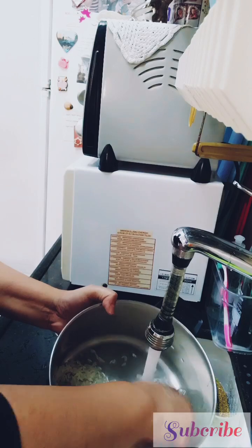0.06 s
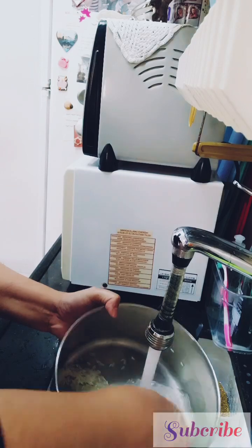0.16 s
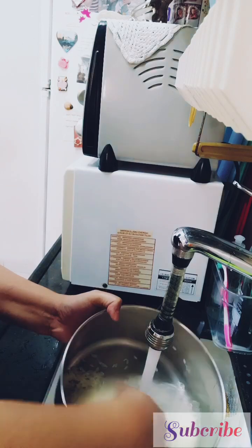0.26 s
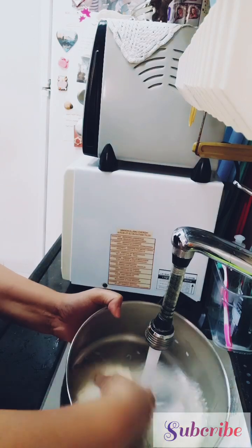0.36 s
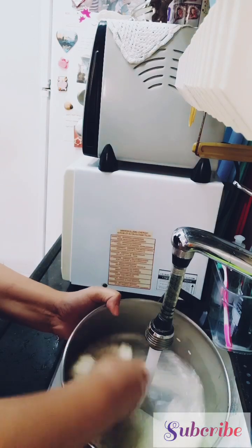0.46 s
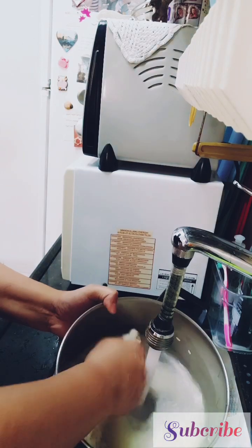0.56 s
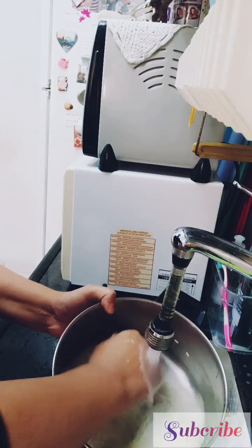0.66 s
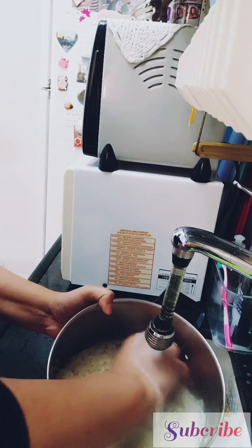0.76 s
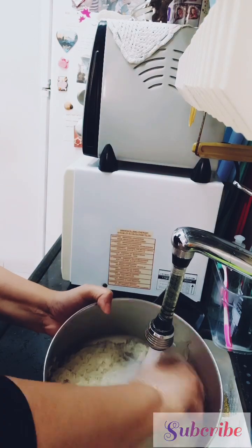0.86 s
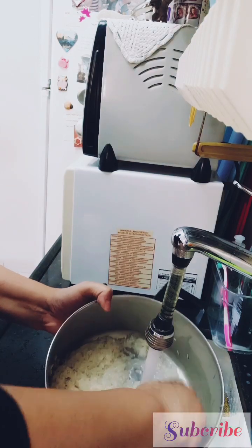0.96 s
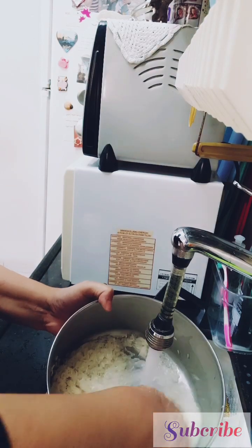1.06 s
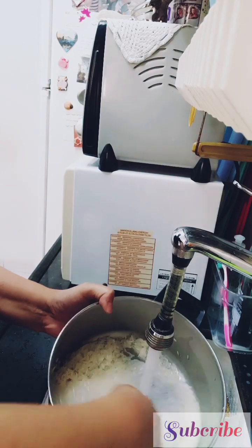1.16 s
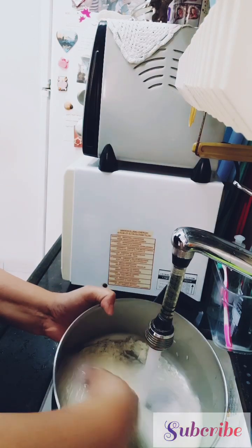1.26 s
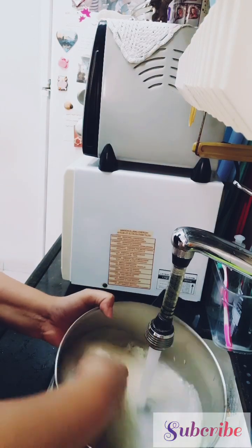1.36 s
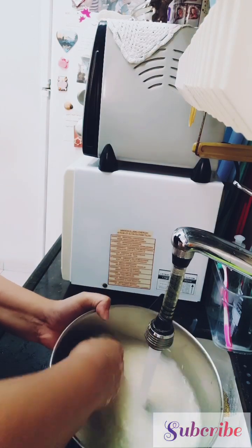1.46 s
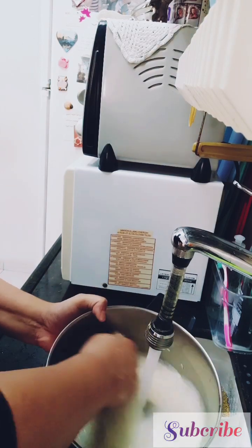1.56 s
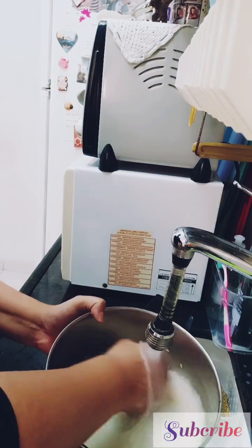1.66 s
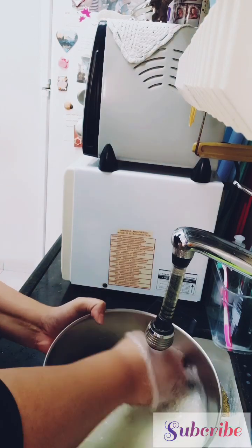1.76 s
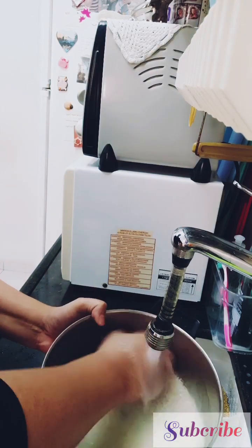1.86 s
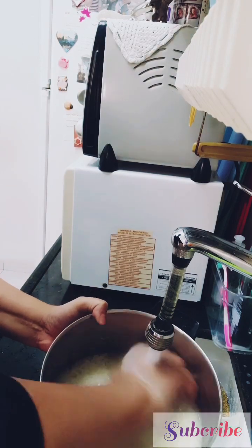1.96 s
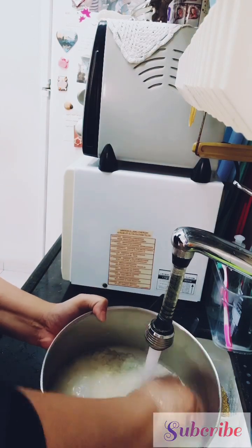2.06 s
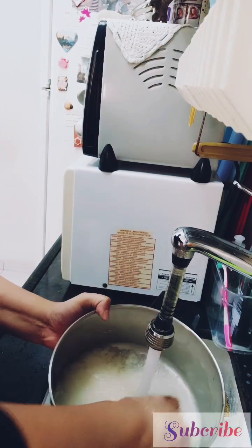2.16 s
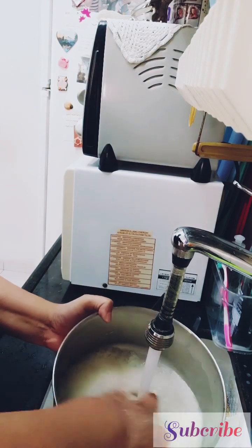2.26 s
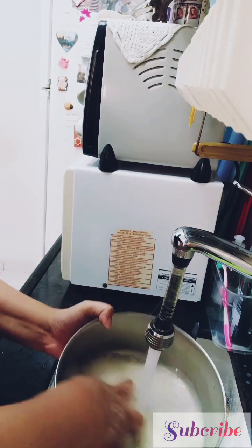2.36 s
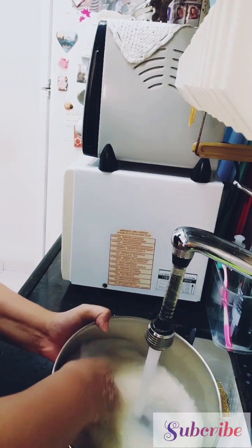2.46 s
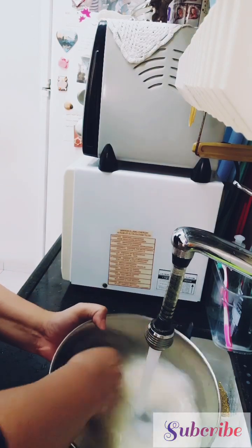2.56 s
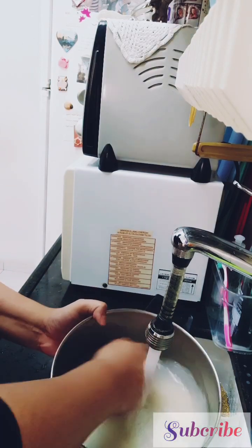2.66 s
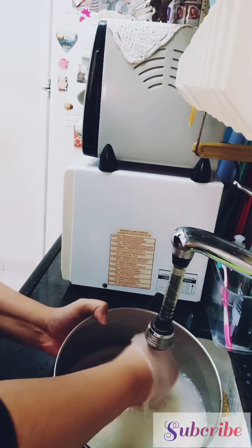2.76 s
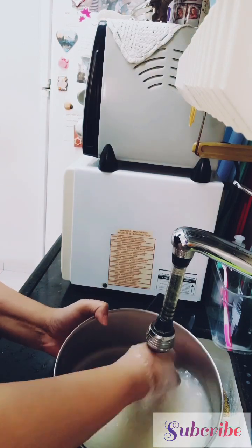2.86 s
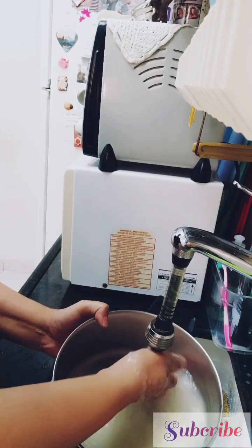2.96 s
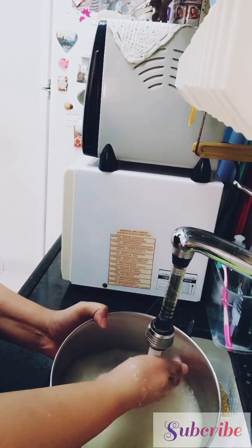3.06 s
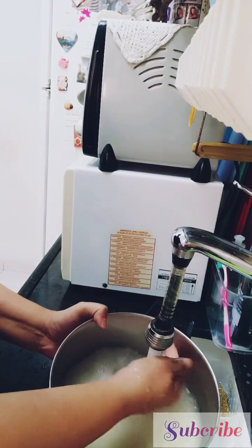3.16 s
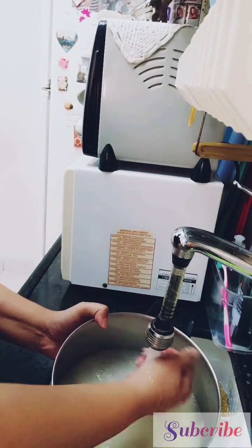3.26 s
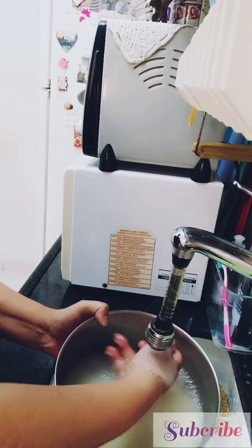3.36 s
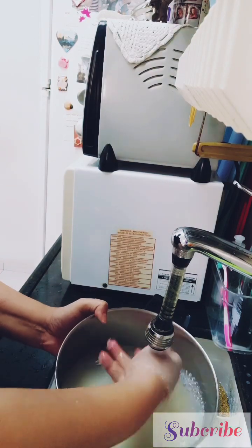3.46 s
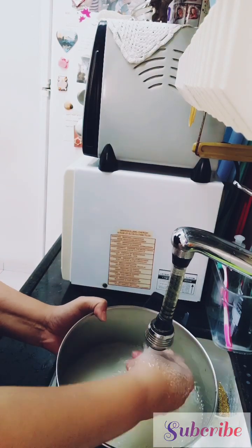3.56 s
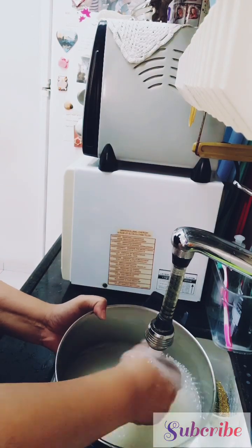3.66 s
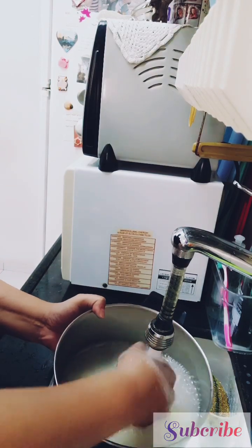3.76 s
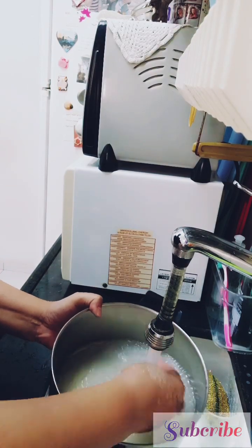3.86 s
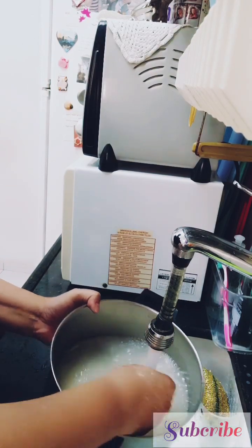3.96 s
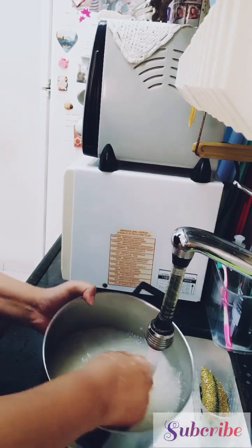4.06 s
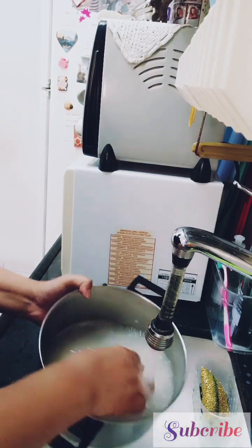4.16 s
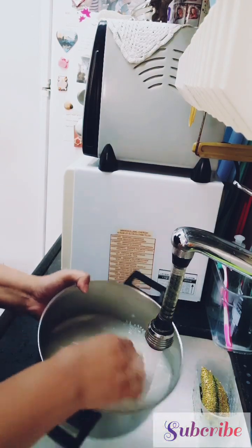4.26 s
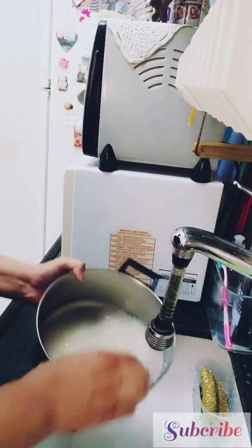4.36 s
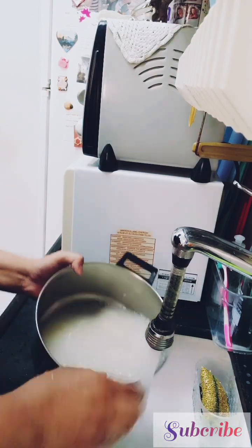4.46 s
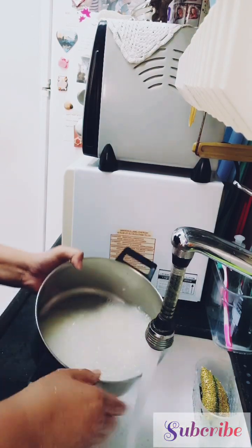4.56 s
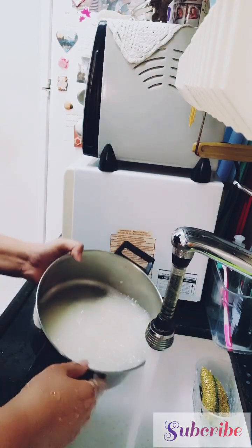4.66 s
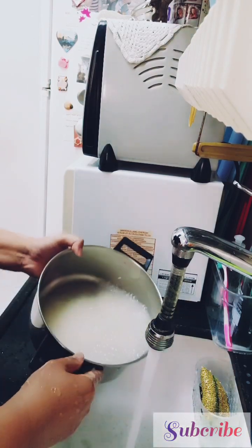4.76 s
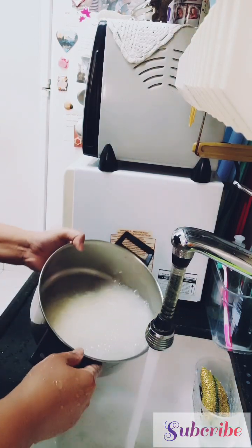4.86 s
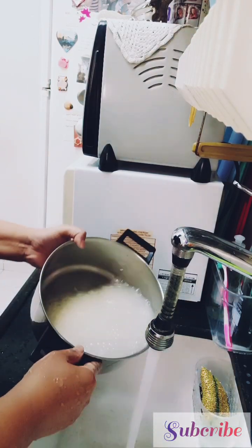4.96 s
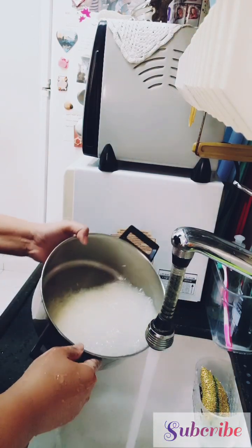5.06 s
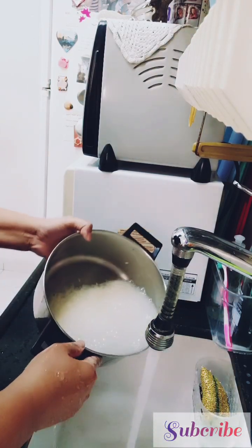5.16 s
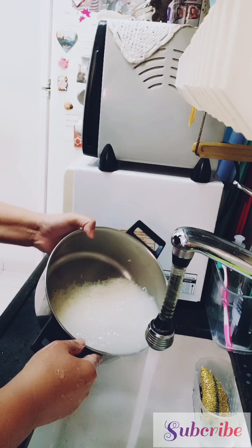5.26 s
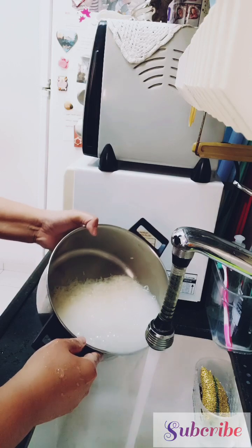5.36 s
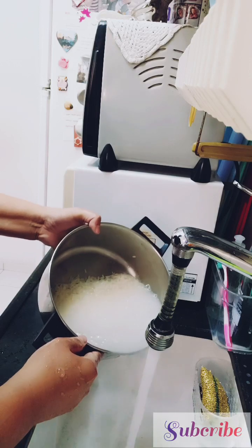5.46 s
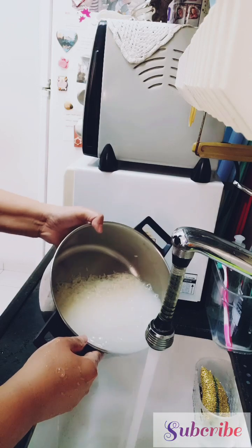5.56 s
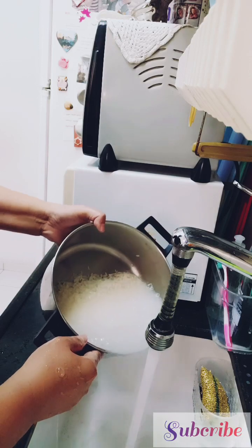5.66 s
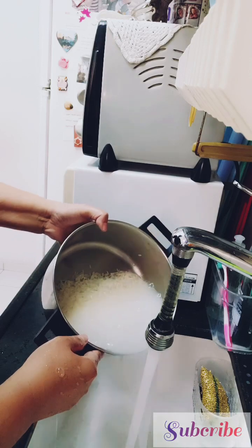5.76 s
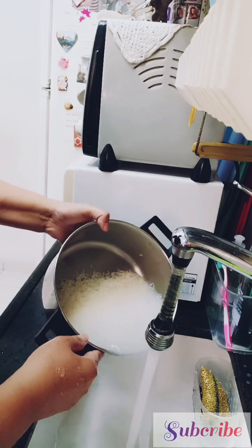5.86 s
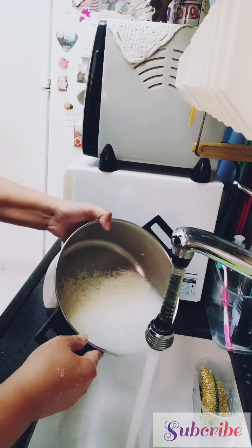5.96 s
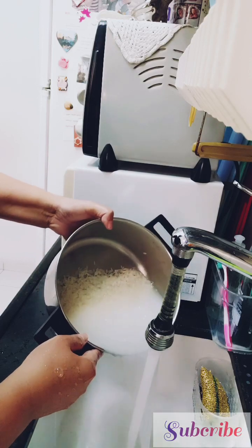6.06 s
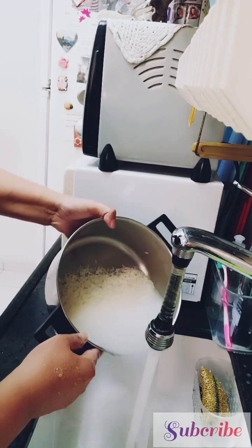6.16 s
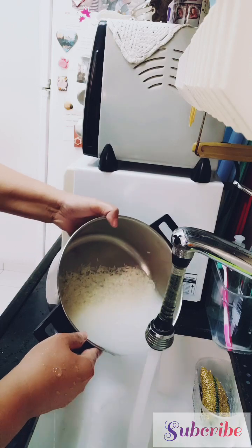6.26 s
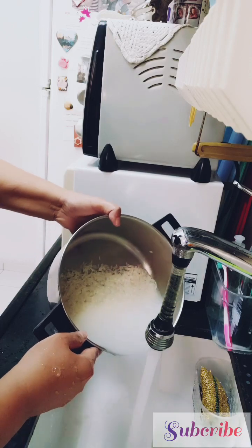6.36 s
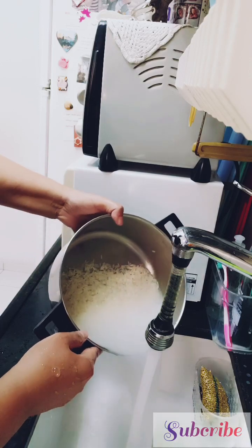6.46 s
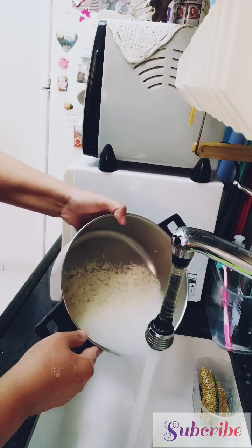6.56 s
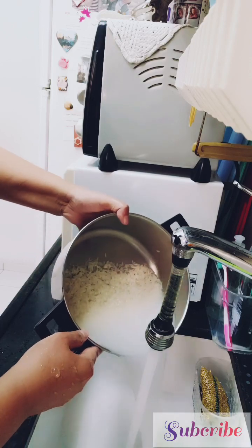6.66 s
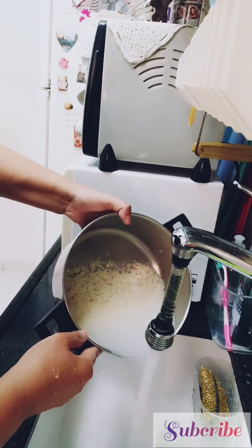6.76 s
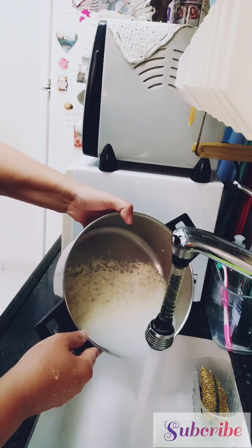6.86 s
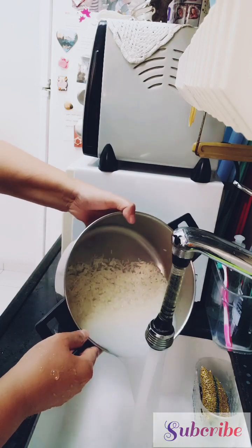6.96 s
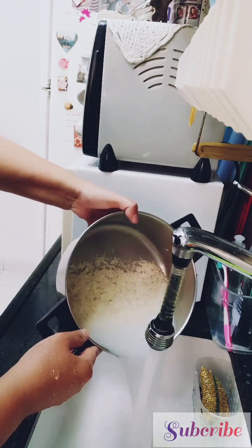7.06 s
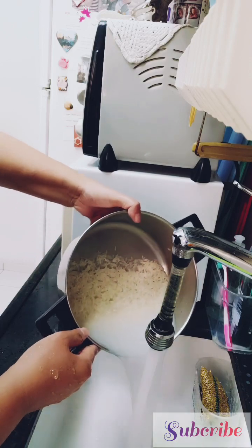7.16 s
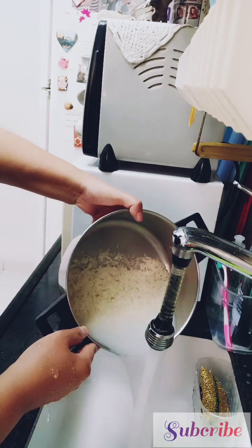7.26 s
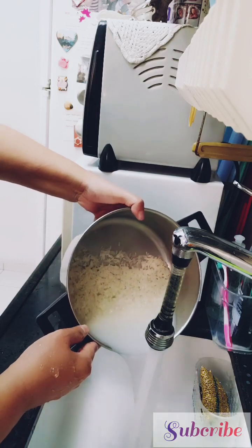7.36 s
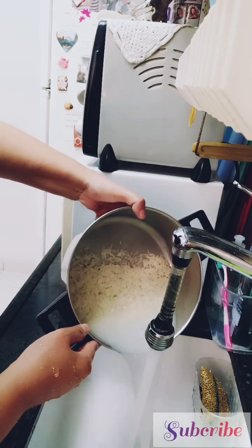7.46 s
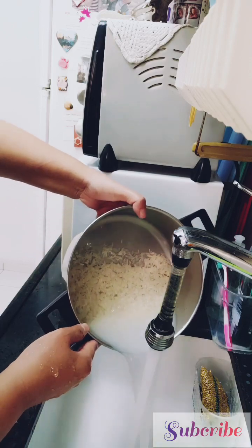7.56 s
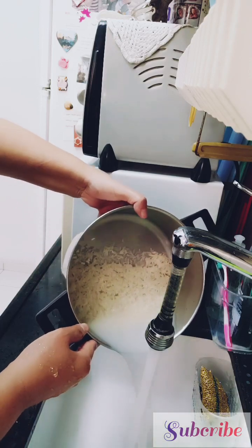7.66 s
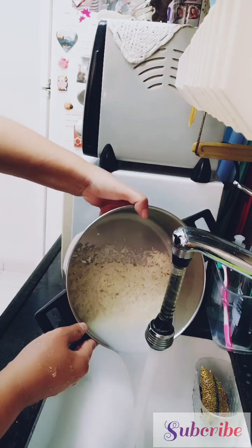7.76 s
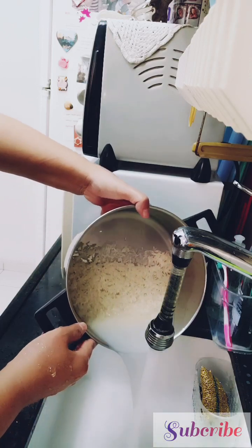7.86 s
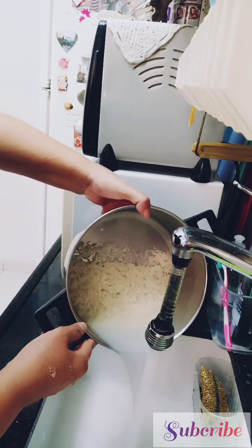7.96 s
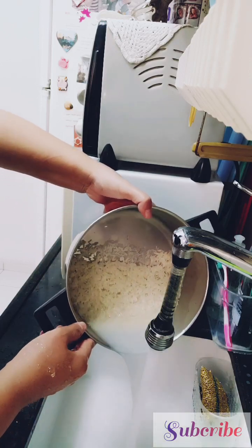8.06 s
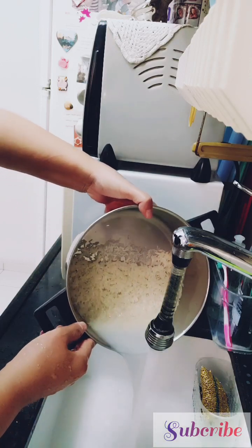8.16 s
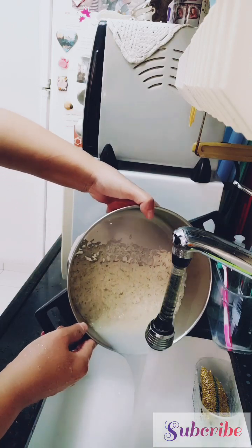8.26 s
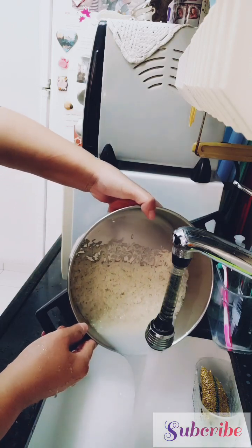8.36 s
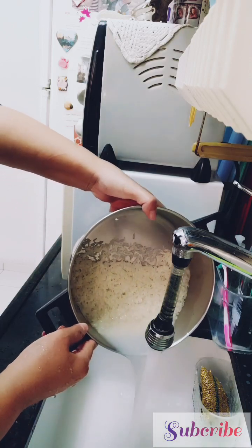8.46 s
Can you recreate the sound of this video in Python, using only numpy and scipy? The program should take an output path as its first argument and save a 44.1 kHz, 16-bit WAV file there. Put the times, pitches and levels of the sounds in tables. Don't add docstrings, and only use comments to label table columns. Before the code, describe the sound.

Close stereo microphones catch running water in two stages. First a modest, aerated plunge into a pot, stirred in rhythmic swishes, with plinks and rice pinging on steel, gradually softer. Halfway through it jumps to sharp hissing spatter on a ringing sink, broken by slops of poured water and cracking drops. A hard-surfaced room adds short reflections; faint machine hum and drain gurgles sit below.

```python
import sys
import numpy as np
from scipy import signal
from scipy.fft import rfft, irfft, next_fast_len
from scipy.io import wavfile
from scipy.ndimage import uniform_filter1d, minimum_filter1d

SR = 44100
rng = np.random.default_rng(int(sys.argv[2]) if len(sys.argv) > 2 else 0)


def file_out(sig):
    cols = np.atleast_2d(sig).T
    lim = np.clip(cols, -1, 1)
    pcm = np.round(lim * 32767).astype(np.int16)
    wavfile.write(sys.argv[1], SR, pcm)


def decibels_to_gain(level_db):
    exponent = np.asarray(level_db, float) / 20
    return 10 ** exponent


N = 374850

# [f/Hz, level/dB]
MIST = [(2000, -34.5), (5000, -21), (7500, 5.5), (9000, 2.5), (12000, 4.5), (14000, -3.5), (16000, 5.5)]
# [f/Hz, level/dB]
SINK_SPRAY = [(1000, -34.5), (2500, -31.5), (4500, -6.5), (6500, 6.5), (8500, 8), (11000, -36),
              (16000, -3.5)]
SINK_SLOSH = [(700, -47), (1500, -16), (2500, -5.5), (4000, -1.5), (5500, 5), (8000, -11)]
# [f/Hz, width/Hz, level/dB, left-right/dB]
SINK_RING = [(2470, 76, -6, -8), (3086, 94, -2.5, 1), (3450, 33, -5, -36), (3940, 75, 8, -1),
             (4150, 75, 0.5, 2), (4500, 79, -4, 7), (4710, 74, 9, -1), (6077, 123, 9, 10),
             (6490, 110, 0.5, 13.5), (8260, 46, 4.5, 18), (8810, 130, 4.5, -2), (9780, 97, -3, 13.5),
             (11740, 130, -2.5, 16), (16700, 350, 11.5, 20)]


def rms_one(x):
    return x / np.sqrt(np.mean(x ** 2) + 1e-20)


def in_time(rows):
    s, *columns = np.transpose(rows)
    return [np.interp(np.arange(N) / SR, s, c, left=-120) for c in columns]


def at_hz(points, hz):
    table_hz, values = np.array(points)[:, 0], np.array(points)[:, 1]
    return np.interp(np.log(hz + 1), np.log(table_hz), values)


def coloured(x, spectrum):
    magnitude = decibels_to_gain(at_hz(spectrum, np.fft.rfftfreq(8192, 1 / SR)))
    cepstrum = irfft(np.log(magnitude))
    cepstrum[1:4096] *= 2
    cepstrum[4097:] = 0
    response = irfft(np.exp(rfft(cepstrum)))[None, :4096]
    return signal.oaconvolve(x, response, axes=1)[:, :N]


def stereo_noise(lag):
    # [f/Hz, share 0-1]
    alike_share = [(25, 0.69), (130, 1), (300, 0.92), (600, 0.97), (1200, 0.18), (3000, 0.44), (6000, 0.67),
                   (12000, 0.17), (16000, 0.063)]
    size = next_fast_len(N)
    hz = np.fft.rfftfreq(size, 1 / SR)
    common, left, right = rfft(rng.standard_normal((3, size)))
    alike = np.clip(at_hz(alike_share, hz), 0, 1)
    late = common * np.exp(-2j * np.pi * hz * lag / SR)
    shared = np.sqrt(alike) * np.array([late, common])
    own = np.sqrt(1 - alike) * np.array([left, right])
    return irfft(shared + own, size)[:, :N]


def spatter(per_s, spread_db, burst_ms, share):
    sizes = decibels_to_gain(spread_db * np.minimum(rng.exponential(1, N), 3.2)) ** 2
    drops = sizes * (rng.random(N) < per_s / SR)
    r = np.exp(-1000 / (burst_ms * SR))
    power = signal.lfilter([1], [1, -r], drops)
    share = np.clip(share, 0, 1)
    return np.sqrt(1 - share + share * power / power.mean())


def patchy(x, together_db, own_db, per_s):
    hz, s, z = signal.stft(x, SR, nperseg=256)
    chance = rng.standard_normal((17, len(s)))
    r = np.exp(-2 * np.pi * per_s * 128 / SR)
    slow = rms_one(signal.lfilter([1], [1, -r], chance))
    place = np.clip(4 * np.log2(hz / 1000 + 1), 0, 14.99)
    low, part = place.astype(int), (place % 1)[:, None]
    own = (slow[low] * (1 - part) + slow[low + 1] * part) / np.hypot(part, 1 - part)
    gain = decibels_to_gain(together_db * slow[16] + own_db * own)
    return signal.istft(z * gain, SR, nperseg=256)[1][:, :N]


def ringing(x, modes, sign, wander_db=0, per_s=6.0):
    out, knots = 0, np.arange(0, N / SR + 1, 1 / per_s)
    for k, (hz, width, db, pan_db) in enumerate(modes):
        r = np.exp(-np.pi * width / SR)
        ring = signal.lfilter([1 - r, 0, r - 1], [1, -2 * r * np.cos(2 * np.pi * hz / SR), r * r], x)
        free = decibels_to_gain(wander_db * rng.standard_normal(400)[:len(knots)])
        moving = ring * np.interp(np.arange(N) / SR, knots, free)
        out = out + moving * decibels_to_gain(db + pan_db * np.array([[.5], [-.5]])) * sign ** k
    return out


def laid_out(at_s, hz, db, cycles, rise):
    t = np.arange(1500) / SR
    life = t * hz / cycles
    swell = 1 - np.exp(-t / .0008)
    rings = np.sin(2 * np.pi * hz * t * (1 + rise * life)) * np.exp(-3 * life) * swell
    where = (at_s * SR + np.arange(1500)).astype(int).ravel()
    sides = [rings, np.roll(rings, -5, axis=1)]
    return np.array([np.bincount(where, (decibels_to_gain(db[:, k:k + 1]) * sides[k]).ravel(), N)[:N] for k in (0, 1)])


def bubbles(count, low_hz, high_hz, cycles, rise):
    draw = rng.random((count, 5))
    hz = low_hz * (high_hz / low_hz) ** draw[:, 1:2]
    db = -4.0 * np.log(draw[:, 2:3] + 0.0093) + 3.0 * draw[:, 3:]
    return rms_one(laid_out(draw[:, :1] * N / SR, hz, db, cycles, rise))


def slap_levels(table, rise_ms, fall_ms, mid_db):
    rows = np.array(table)
    hits = np.zeros((2, N))
    hits[:, (rows[:, 0] * SR).astype(int)] = decibels_to_gain([rows[:, 1], rows[:, 1] + rows[:, 2] + mid_db])
    r = np.exp(-1000 / (fall_ms * SR))
    q = np.exp(-1000 / (rise_ms * SR))
    falling = signal.lfilter([1], [1, -r], hits)
    return signal.lfilter([1 - q], [1, -q], falling)


def echoes(x, t60, wet_db, dull_hz):
    t = np.arange(8192) / SR
    band = signal.butter(2, [900, dull_hz], "band", fs=SR, output="sos")
    tail = signal.sosfilt(band, rng.standard_normal((2, len(t))))
    tail = tail * decibels_to_gain(-60 * t / t60) * (t > .0008)
    tail *= decibels_to_gain(wet_db) / np.sqrt(np.sum(tail ** 2, axis=1, keepdims=True))
    return x + signal.oaconvolve(x, tail, axes=1)[:, :N]


def lifts(rows, rise_s, fall_s):
    t, lift_db = np.arange(N) / SR, 0
    for s, hold, db in rows:
        corners = np.cumsum([s - rise_s, rise_s, hold, fall_s])
        lift_db = lift_db + db * np.interp(t, corners, [0, 1, 1, 0])
    return lift_db


def layers(table, force_db, mean_db, *moves):
    rows = np.array(table)
    levels = mean_db + rows[:, :1] + rows[:, 1:] @ np.array([force_db - mean_db, *moves])
    return np.where(force_db > -60, levels, -120)


def hum():
    # [f/Hz, level/dB]
    hum_colour = [(12, -32), (20, 14), (37, 4.5), (65, -3.5), (129, 4), (209, -16), (344, -15.5),
                  (420, -4.5), (485, -16), (551, -1.5), (600, -6), (780, -54), (1320, -120)]
    return decibels_to_gain(-53.9) * rms_one(coloured(stereo_noise(0), hum_colour + [(900, -31.0)]))


def drain():
    # [f/Hz, level/dB]
    rumble = [(60, -24), (130, -10), (200, 0.5), (300, -7.5), (500, -29.5)]
    # [t/s, length/s, lift/dB]
    gulps = [
        (0.0, 0.016, 7),
        (0.78, 0.03, 3),
        (6.75, 0.02, 10),
        (7.25, 0.02, 6.5),
        (7.62, 0.039, 10),
    ]
    level_db = -60 + lifts(gulps, rise_s=0.1, fall_s=0.062)
    return decibels_to_gain(level_db) * rms_one(coloured(stereo_noise(0), rumble))


def plinks():
    # [t/s, peak level/dB, f/Hz]
    plink_rows = np.array([(1.7118, -28, 1800), (1.9406, -16, 2690), (1.945, -22, 1856), (1.943, -22, 2300),
                           (2.0323, -27, 1900), (2.155, -22, 1900), (2.526, -18.5, 2230), (2.78, -26, 1970),
                           (2.9421, -34, 1780), (3.076, -25, 2460), (3.2514, -33, 1470),
                           (3.4025, -26, 2960), (3.7477, -21, 2570), (3.791, -38, 1185), (3.976, -35, 1120),
                           (4.042, -28.5, 1800), (4.1164, -31, 1350), (4.139, -32.5, 1160),
                           (4.3808, -32, 2470), (7.014, -7, 3940), (7.205, -16, 2880), (7.3797, -15, 2470),
                           (7.9, -20.5, 1870), (8.078, -27, 1860), (8.1866, -14.5, 2990),
                           (8.267, -26.5, 1840), (8.471, -3, 4740)])
    # [t/s, peak level/dB, f/Hz]
    ping_rows = np.array([
        (2.866, -19, 6760),
        (2.9143, -12, 7170),
        (3.92, -16, 7150),
        (4.115, -13, 5900),
    ])
    low = laid_out(plink_rows[:, :1], plink_rows[:, 2:], plink_rows[:, 1:2] + [-3., -4.],
                   cycles=49.0, rise=0.032)
    high = laid_out(ping_rows[:, :1], ping_rows[:, 2:], ping_rows[:, 1:2] + [-9., -9.], cycles=96.0, rise=0)
    return low + high


def rattles():
    # [t/s, length/s, level/dB, f/Hz]
    handfuls = [(2.47, 0.032, -36, 6900), (2.692, 0.026, -47, 6050), (2.756, 0.038, -37.5, 6860),
                (2.805, .02, -38, 6890), (2.834, 0.057, -32.5, 6830), (2.937, .02, -37, 6700),
                (2.98, 0.034, -37, 6050), (3.019, 0.053, -32, 6990), (3.037, 0.071, -36, 5600),
                (3.095, 0.069, -32.5, 6910), (3.196, .06, -44, 6850), (3.235, .05, -39, 9000),
                (3.222, 0.055, -43, 6300), (3.367, .045, -36.5, 6820), (3.39, 0.088, -39, 6300),
                (3.42, .045, -44, 6840), (3.465, 0.028, -38, 5870), (3.637, .03, -41, 10900),
                (3.71, 0.011, -33, 10000), (3.711, .012, -30, 11400), (3.715, .012, -30, 12300),
                (3.736, 0.023, -44, 7000), (3.739, 0.027, -33.5, 4400), (3.77, 0.018, -44, 6600),
                (3.806, .035, -33, 6740), (3.81, 0.059, -42, 10150), (3.96, 0.053, -41, 10340),
                (4.006, .04, -41, 6340), (4.114, 0.031, -33.5, 6030), (4.137, .07, -34, 6200),
                (4.1, 0.082, -39, 10420), (4.105, 0.06, -47, 4450), (4.263, 0.023, -47, 6650),
                (4.274, 0.071, -45, 10400), (4.66, 0.037, -36, 4000), (5.3, .03, -33.5, 3870),
                (7.047, 0.022, -23, 5660), (6.248, 0.023, -24.5, 4430), (6.96, 0.024, -21.5, 6550),
                (7.869, .03, -25.5, 4700), (7.911, .05, -30, 4800), (8.273, .03, -30, 4150)]
    width_hz, pan_db = 114, -4
    out, r = np.zeros(N), np.exp(-np.pi * width_hz / SR)
    grains = rng.standard_normal((len(handfuls), 8192))
    for (s, length, db, hz), noise in zip(handfuls, grains):
        swell = np.sin(np.pi * np.clip(np.arange(8192) / SR / length, 0, 1)) ** 0.77
        turn = 2 * np.pi * hz / SR
        ring = signal.lfilter([np.sqrt(1 - r)], [1, -2 * r * np.cos(turn), r * r], noise * swell)
        out[int(s * SR):int(s * SR) + 8192] += 2 * decibels_to_gain(db) * np.sin(turn) * ring
    return out * decibels_to_gain(pan_db * np.array([[.5], [-.5]]))


def slaps():
    # [t/s, peak level/dB, 2-5 kHz part against it/dB]
    lumps = [(1.7325, -9, -22), (1.9437, -17, -11), (2.315, -33.5, 5), (2.9145, -21, -27),
             (3.717, -22, -18), (3.8162, -23, -12), (4.114, -28, -23), (4.552, -11, -7.5),
             (5.5465, -4, -48), (5.9165, -13, -18), (6.2472, -15, -0.5), (6.312, -2.5, -13),
             (6.339, -10, -36), (6.3862, -6, -16.5), (6.5384, -7.5, -21), (6.82, -9, -32),
             (6.8763, -18, -31), (6.9623, -12.5, -11.5), (6.971, -7, -41), (7.055, -15, -6),
             (7.107, -19.5, -1), (7.1487, -13.5, -6.5), (7.204, -16, -24), (7.348, -12.5, -6.5),
             (7.569, -2, -33), (7.7485, -4, -36), (8.282, -9, -30), (8.3255, -5, -27), (7.984, -20, 3.5),
             (8.079, -13, -6), (4.6472, -11, -28), (4.68, -14, -16), (5.16, -10, -23), (5.24, -4.5, -22.5),
             (5.31, -11, -20), (5.4109, -31, -37), (5.4329, -27, -34), (5.4513, -20, -36),
             (5.8135, -12, -22), (5.9557, -8, -22), (6.175, -18, -7.5), (6.4241, -13, -25),
             (6.479, -11, -21), (6.5643, -25, -27), (6.5848, -15, -21), (6.9145, -15, -21),
             (6.9454, -14, -22), (7.015, -12.5, -12), (7.0497, -14, -20), (7.0951, -14, -17),
             (7.2822, -13, -26), (7.3211, -15, -15), (7.5087, -16.5, -12.5), (7.6324, -17, -21),
             (7.6603, -10, -23), (7.7072, -11.5, -17), (7.7726, -11, -21), (7.8698, -11, -18),
             (8.1602, 1.5, -18.5), (8.4106, -27, -30)]
    # [t/s, peak level/dB, 2-5 kHz part against it/dB]
    cracks = [(2.8678, -7, -19), (2.9143, -19, -21), (3.3934, -22, -15), (4.1145, -20, -17),
              (4.5532, -1, -7), (4.5894, -3, -24), (4.7985, -7, -27), (5.0838, -4, -20), (5.9154, -6, -28),
              (6.6674, -9, -28), (7.0569, -3, -14), (7.349, -11, -2), (7.5893, -7, -25), (7.7574, -12, -27),
              (7.899, -2, -21), (7.9723, -3, -3), (8.081, -11, -14), (8.3944, -13, -21)]
    soft = slap_levels(lumps, rise_ms=1.7, fall_ms=4.43, mid_db=-7)
    hard = slap_levels(cracks, rise_ms=0.18, fall_ms=0.61, mid_db=-6)
    bright, middle = soft + decibels_to_gain(-4.5) * hard
    noise = stereo_noise(-10.0)
    crack = rms_one(decibels_to_gain(-4.5) * coloured(noise, MIST) + coloured(noise, SINK_SPRAY)) * bright
    thud = rms_one(coloured(noise, SINK_SLOSH)) * middle
    sheet = ringing(thud, SINK_RING, sign=0.83, wander_db=5.0, per_s=11.0)
    return decibels_to_gain(-1) * crack + decibels_to_gain(12) * (thud + 2 * sheet)


def rice():
    # [f/Hz, width/Hz, level/dB, left-right/dB]
    rice_ring = [(4300, 90, -5, 8), (5730, 41, -1, -13), (5990, 37, -5, -11), (6300, 140, -9, 2),
                 (6860, 27, 0.5, 1.5), (7100, 56, -16, -11), (7660, 130, 12, -1), (9000, 68, -10, -1),
                 (10270, 80, 2, 2)]
    sizes = decibels_to_gain(5.5 * np.minimum(rng.exponential(1, N), 3.5))
    ticks = sizes * (rng.random(N) < 900 / SR) + 1e-18
    dealt = rng.integers(0, len(rice_ring), N)
    return rms_one(sum(ringing(ticks * (dealt == k), [mode], sign=1) for k, mode in enumerate(rice_ring)))


def pot_wall():
    # [f/Hz, width/Hz, level/dB, left-right/dB]
    wall_modes = [(429.5, 35, -5, -3), (540, 13.3, 6.5, -0.5), (604, 38, 2, 4.5), (683, 21, 6, -4.5),
                  (996, 130, -9, 12), (1048, 20, -8, 6), (1270, 20, -23, -6)]
    lumps = stereo_noise(-5.5) * spatter(120, 3.2, 8.2, share=0.73)
    return rms_one(ringing(lumps, wall_modes, sign=-0.97, wander_db=3.0, per_s=4.0))


def pot_drops(full):
    # [f/Hz, width/Hz, level/dB, left-right/dB]
    shallow_ring = [(1850, 28, -10, -19), (1935, 24, -5, 15), (2280, 15, -2.5, -6), (2970, 77, 0.5, 2),
                    (6860, 33, -17, -10)]
    full_ring = [(1030, 220, -2, 6), (2470, 23, 10.5, 5.5), (10400, 1000, -11, -21)]
    drops = stereo_noise(-5.0) * spatter(420, 2.3, 1.4, share=0.28)
    early = (1 - full) * ringing(drops, shallow_ring, sign=0.83, wander_db=6.5, per_s=11.0)
    late = full * ringing(drops, full_ring, sign=0.56, wander_db=5.0, per_s=10.0)
    return patchy(drops + early + late, 0.35, 1.74, per_s=7.2)


def pot():
    # [t/s, level/dB]
    plunge = [(0, -34), (0.24, -34), (0.3, -29.5), (0.75, -30), (0.82, -33.5), (1.4, -31), (1.68, -32),
              (2.0, -32.5), (2.6, -32.5), (2.72, -36.5), (3.0, -38), (3.35, -40.5), (3.68, -41),
              (3.74, -36.5), (4.0, -41), (4.2, -41.5), (4.53, -40), (4.7, -64.5)]
    # [t/s, length/s, lift/dB]
    swirls = [(0.2, 0.57, 1.5), (1.1, 0.46, 2), (1.9, 0.63, 1.5), (2.5, 0.048, 2.5), (2.77, 0.015, 0),
              (3.04, 0.1, 0), (3.38, 0.051, -0.5), (3.8, 0.06, -0.5), (4.12, 0.06, 0)]
    # [t/s, length/s, loss/dB]
    catches = [(0.0, 0.11, -1), (0.84, 0.12, -1.5), (1.64, 0.059, -1), (2.41, 0.021, -3),
               (2.81, 0.11, -6.5), (4.4, 0.35, -2.5)]
    # [t/s, share 0-1]
    rice_share = [(0, 0.04), (2.3, 0), (2.8, 0.02), (3.5, 0), (4.5, 0.09)]
    filling = 2.33, 2.38
    # [level against the force/dB, share of its swing, of a swirl, of a catch, change once full/dB]
    pot_layers = [
        (-1.5, 1.0, 0.24, 0.085, -1),
        (-2.5, 0.92, 1.12, 0.35, -2),
        (-1, 0.36, 0.088, 0.47, -5),
        (-10.5, 0.22, 1.6, 1.4, -6.5),
    ]
    # [f/Hz, level/dB]
    spray_colour = [(2500, -34.5), (4500, -16), (5600, 2.5), (7200, 4.5), (8500, 3.5), (12000, -34.5)]
    slosh_colour = [(500, -60), (860, -14), (1020, -9), (1900, -1), (3000, -1), (4500, 1.5), (6000, -23),
                    (9000, -28.5)]
    share = np.clip(in_time(rice_share)[0], 0, 1)
    full = np.interp(np.arange(N) / SR, filling, [0, 1])
    swirl_db = lifts(swirls, rise_s=0.022, fall_s=0.12)
    catch_db = lifts(catches, rise_s=0.029, fall_s=0.029)
    mist_db, spray_db, slosh_db, wall_db = layers(pot_layers, in_time(plunge)[0], -36, swirl_db, catch_db, full)
    drops = pot_drops(full)
    froth = bubbles(count=1500, low_hz=872.6, high_hz=4836, cycles=43.0, rise=0.033)
    froth = rms_one(coloured(froth, slosh_colour))
    blips = bubbles(count=900, low_hz=4700, high_hz=11740, cycles=103.0, rise=0.021)
    mist = rms_one(coloured(drops, MIST)) + decibels_to_gain(-12.5) * full * blips
    spray = np.sqrt(1 - share) * rms_one(coloured(drops, spray_colour)) + decibels_to_gain(4) * np.sqrt(share) * rice()
    slosh = rms_one(coloured(drops, slosh_colour)) + decibels_to_gain(-13.5) * froth
    water = decibels_to_gain(mist_db + 3.5) * mist + decibels_to_gain(spray_db + 4.5) * spray + decibels_to_gain(slosh_db + 5.5) * slosh
    return echoes(water, t60=0.2, wet_db=-10.5, dull_hz=6850) + decibels_to_gain(wall_db + 1.5) * pot_wall()


def sink():
    # [t/s, level/dB]
    burst = [(4.537, -30), (4.56, -20), (5.3, -20.5), (6.18, -21), (6.28, -25.5), (6.5, -26), (6.6, -21),
             (6.77, -20.5), (6.8, -32), (6.87, -33), (6.97, -28), (7.2, -25.5), (7.28, -30.5), (7.37, -21),
             (7.6, -22.5), (7.9, -24), (8.33, -24), (8.5, -30)]
    # [t/s, length/s, lift/dB]
    pours = [(4.55, 0.015, 2), (5.76, 0.24, 2.5), (6.18, 0.013, 1.5), (6.25, 0.24, 6), (6.6, 0.16, 3),
             (6.97, 0.03, 4.5), (7.09, 0.027, 5.5), (7.16, 0.095, 7), (7.35, 0.026, -1), (7.9, 0.2, 11),
             (8.18, 0.27, 7.5)]
    # [level against the force/dB, share of its swing, of a pour]
    sink_layers = [
        (1, 1.0, 0.0054),
        (-8, 0.99, 0.59),
        (-18.5, 0.21, 1),
        (-32, 0.09, 0.081),
    ]
    # [f/Hz, level/dB]
    basin_colour = [(300, -15), (550, -7.5), (720, -7.5), (1000, -1), (1500, -0.5), (2200, 0.5),
                    (4000, -30)]
    pour_db = lifts(pours, rise_s=0.11, fall_s=0.062)
    mist_db, spray_db, slosh_db, basin_db = layers(sink_layers, in_time(burst)[0], -22, pour_db)
    drops = stereo_noise(-10.5) * spatter(450, 4.4, 0.33, share=0.23)
    sheet = ringing(drops, SINK_RING, sign=0.86, wander_db=3.0, per_s=14.0)
    drops = patchy(drops + decibels_to_gain(4.0) * sheet, 2.6, 2.9, per_s=32)
    froth = bubbles(count=1500, low_hz=1800, high_hz=5950, cycles=78.0, rise=0.04)
    froth = rms_one(coloured(froth, SINK_SLOSH))
    fizz = bubbles(count=2500, low_hz=4990, high_hz=9950, cycles=134.0, rise=0.048)
    hiss = stereo_noise(-14.0)
    hiss = hiss + decibels_to_gain(3.5) * ringing(hiss, SINK_RING[9:], sign=0.98, wander_db=4.0, per_s=5.0)
    mist = rms_one(coloured(rms_one(drops) + decibels_to_gain(2.5) * rms_one(hiss), MIST))
    spray = rms_one(coloured(drops, SINK_SPRAY)) + decibels_to_gain(-11.0) * fizz
    slosh = rms_one(coloured(drops, SINK_SLOSH)) + decibels_to_gain(-8.0) * froth
    basin = rms_one(coloured(patchy(stereo_noise(-1.5), 0.52, 2.9, per_s=7.1), basin_colour))
    fine = decibels_to_gain(mist_db + 4.5) * mist + decibels_to_gain(spray_db + 4.5) * spray
    return fine + decibels_to_gain(slosh_db + 3.5) * slosh + decibels_to_gain(basin_db + 7.0) * basin


def scene():
    at_sink = sink() + slaps() + plinks() + rattles()
    return hum() + drain() + echoes(at_sink, t60=0.35, wet_db=-9.0, dull_hz=5440) + pot()


def top_cut(x):
    return signal.sosfilt(signal.butter(12, 16920, fs=SR, output="sos"), x)


def record(dry):
    # [f/Hz, level/dB]
    left_port = [(20, -1.5), (2000, 1.5), (5000, 1), (6000, 3.5), (6900, 8.5), (7300, 5.5), (7700, -4.5),
                 (8400, -9.5), (9300, 4), (10300, 10), (12000, 3), (13500, 16), (15200, 13.5),
                 (16000, -16.5)]
    right_port = [(20, -1), (2000, 0.5), (4000, -3.5), (5500, -5.5), (6600, -11), (7200, -16.5), (7700, 1),
                  (8400, 0), (9500, 5.5), (12000, -2.5)]
    right_top = [(20, 0), (12000, 0), (12600, -6), (13500, -10), (14200, -15), (15000, -24), (15700, -38)]
    left = coloured(dry[:1], left_port)
    right = coloured(coloured(dry[1:], right_port), right_top)
    low_pass = signal.ellip(12, .5, 85, 15720, fs=SR, output="sos")
    cut = signal.sosfilt(low_pass, np.vstack([left, right]))
    room_left = np.minimum(1, .95 / (np.abs(cut).max(axis=0) + 1e-9))
    held = cut * uniform_filter1d(minimum_filter1d(room_left, size=129), size=129)
    return top_cut(held)


dry = scene()
out = record(dry)
file_out(out)
```